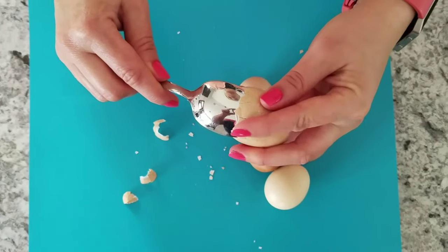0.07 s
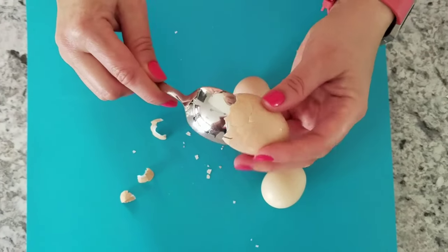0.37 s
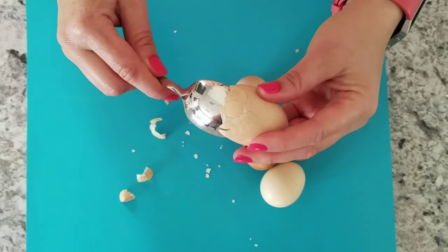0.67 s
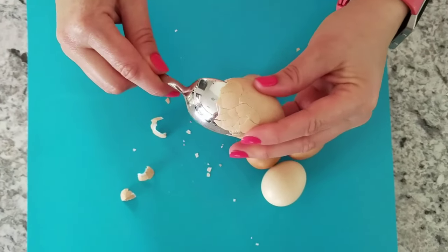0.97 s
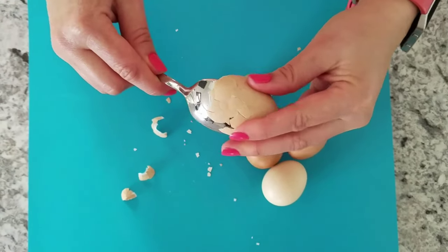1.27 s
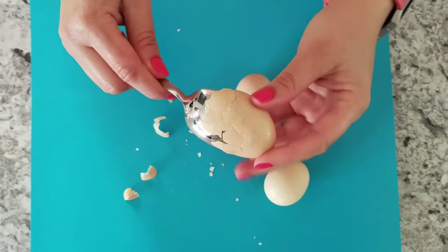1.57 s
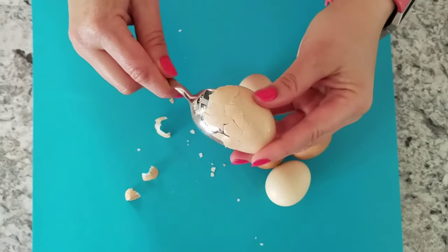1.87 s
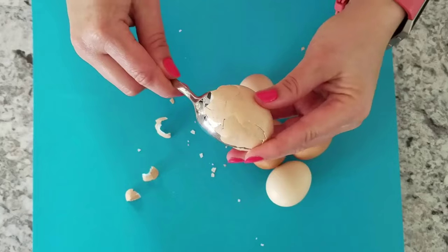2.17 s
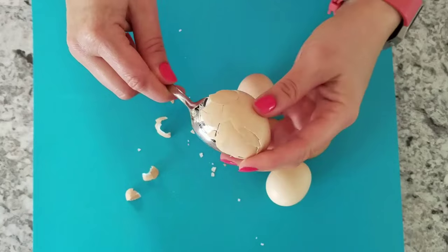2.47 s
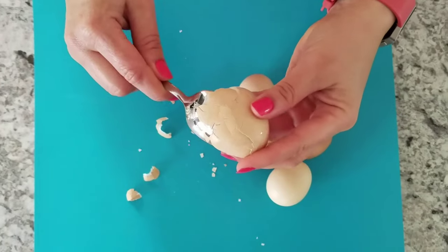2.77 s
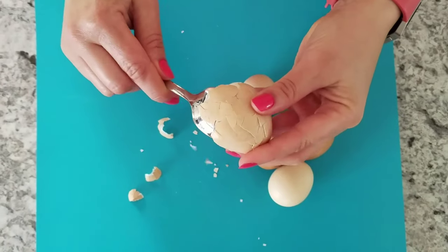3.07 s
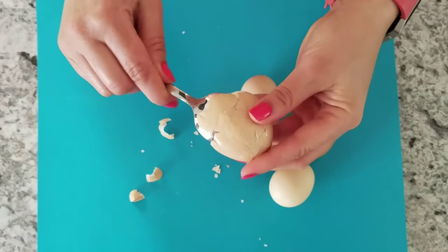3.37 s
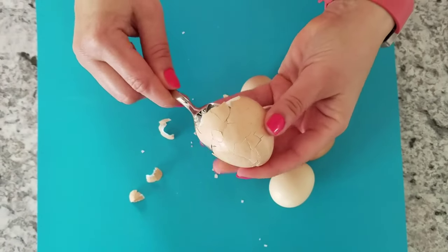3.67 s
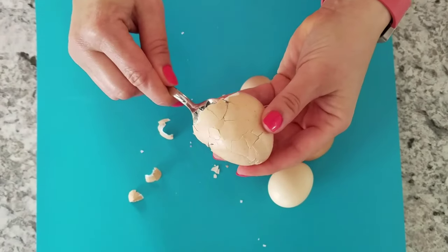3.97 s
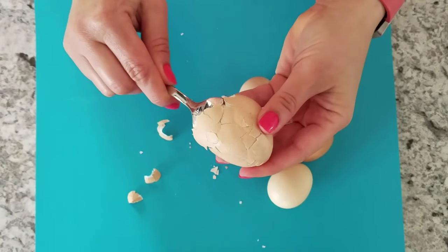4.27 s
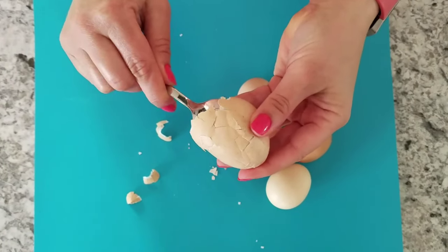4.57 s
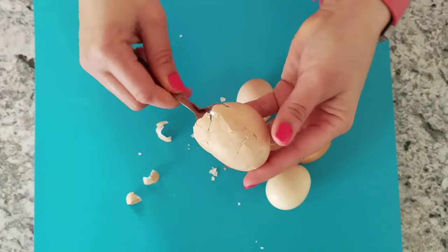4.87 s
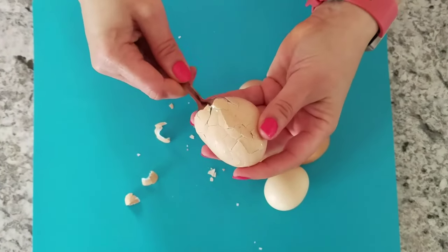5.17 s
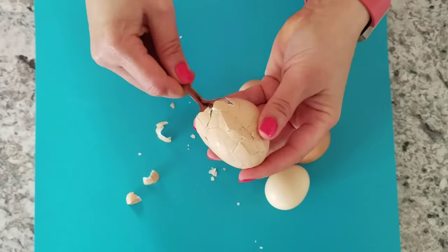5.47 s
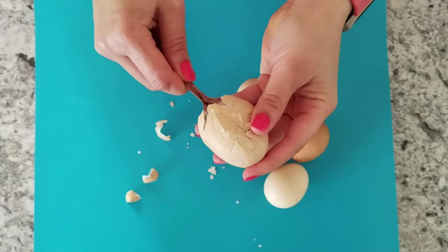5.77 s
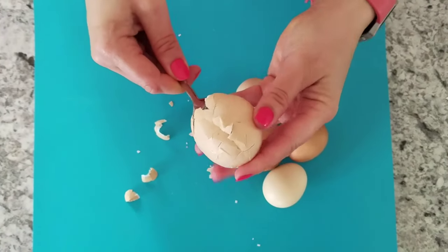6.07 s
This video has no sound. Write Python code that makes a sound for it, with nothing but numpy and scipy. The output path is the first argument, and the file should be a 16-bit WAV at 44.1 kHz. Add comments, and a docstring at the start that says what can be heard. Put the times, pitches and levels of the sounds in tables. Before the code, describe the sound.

A spoon works under the cracked shell of a boiled egg, close to the microphone in a small kitchen. The shell gives way in irregular clusters of dry, crisp snaps, with faint gritty scraping between them. About halfway through come the two loudest cracks, each with a slight thud, and then softer crackling carries on. Hard walls add a short echo, and appliances hum faintly.

```python
"""Spoon peeling a boiled egg

A spoon works under the cracked shell, close to a camera in a small kitchen. The shell gives way
in dry snaps, each ringing the flap it frees and trailing tiny splinters. Between them the spoon
grates on shell and membrane. Hard walls answer; appliances hum."""
import sys
import numpy as np
from scipy import signal
from scipy.fft import rfft, irfft, next_fast_len
from scipy.io import wavfile
from scipy.ndimage import map_coordinates

SR = 44100
rng = np.random.default_rng(int(sys.argv[2]) if len(sys.argv) > 2 else 0)


def put_to_file(sound):
    """Save the sound as 16-bit audio at rate SR, in the file named by the first command-line argument."""
    columns = np.atleast_2d(sound).T  # one column per channel
    safe = np.clip(columns, -1, 1)
    whole_steps = np.round(safe * 32767)
    wavfile.write(sys.argv[1], SR, whole_steps.astype(np.int16))


N = 269892

# Clear breaks. Each row: start in seconds, relative level in dB, flap resonance in Hz, tilt in dB/octave.
SHELL_BREAKS = [(0.0169, -23.5, 2000, 7), (0.0526, -16.5, 1980, 5.5), (.1244, -21.5, 6200, 4),
                (.2745, -34, 8400, 4), (0.4558, -34.5, 8040, 1), (0.6556, -37, 7000, 21),
                (0.8167, -19, 4180, 14), (0.8217, -16.5, 5700, 12), (0.882, -14, 5300, 2),
                (0.9034, -16, 2980, 5.5), (1.0034, -26, 2980, 3.5), (1.0304, -26, 7040, 0),
                (1.2153, -23.5, 4330, -3), (1.2342, -18, 1950, 2.5), (1.2912, -11, 2100, 2.5),
                (1.3075, -19, 6000, 4), (1.3626, -16, 8000, 2), (1.5212, -24, 6600, -2.5),
                (1.9387, -30, 3970, 5.5), (1.9745, -19.5, 8600, -2.5), (2.024, -17.5, 2960, 9),
                (2.1659, -14, 7800, -3), (2.212, -12, 7900, 15), (2.2243, -14.5, 8500, 7),
                (2.2464, -8.5, 4200, 8), (2.2738, -11.5, 4800, 6.5), (2.2984, -9, 5450, 5.5),
                (2.411, -15, 5660, -2.5), (2.611, -27, 6560, 9), (2.833, -29.5, 6850, -2),
                (2.9331, 4, 4470, 8), (2.969, -7, 3800, 6.5), (3.1313, -4, 3840, 1.5),
                (3.1364, -14.5, 3430, 2.5), (3.1712, -18.5, 5000, 4), (3.2616, 1, 8440, 11.5),
                (3.2689, -12.5, 3400, 1), (3.307, -5, 3400, 6.5), (3.3741, -15, 2630, 4),
                (3.4711, -19.5, 5430, 1), (3.5767, -26, 6440, -5.5), (3.7338, -22, 3180, 4),
                (3.8049, -27.5, 3220, -1), (3.8887, -29.5, 3100, 2.5), (3.973, -15.5, 2760, 3),
                (3.9832, -23, 3150, -2.5), (4.0515, -17, 2400, 6.5), (4.0622, -14.5, 2000, 9),
                (4.0773, -15, 2690, 3), (4.0859, -12.5, 3730, 4), (4.306, -27, 6600, -3.5),
                (4.3805, -25, 5740, -5.5), (4.4318, -21.5, 3200, -2), (4.5087, -19, 2690, -4),
                (4.5922, -19.5, 2000, 1.5), (4.6351, -17, 6040, 5), (4.6417, -15.5, 6950, 1),
                (4.679, -17.5, 7100, 10), (4.6936, -20, 7100, 5), (4.7891, -23, 2000, 0.5),
                (4.8228, -11.5, 6000, 2), (4.8542, -14.5, 4870, 0), (5.109, -29, 2820, -5.5),
                (5.2132, -21.5, 6300, -6), (5.367, -25.5, 2000, 4.5), (5.4138, -25.5, 2230, -4.5),
                (5.5493, -18.5, 2000, 14), (5.5856, -18, 2200, 4), (5.6352, -21, 2080, 2.5),
                (5.6752, -13, 2730, 0.5), (5.6906, -15.5, 5000, 2.5), (5.7323, -9.5, 2400, 1.5),
                (5.8604, -21, 2000, 5), (5.8879, -12.5, 2500, 1), (5.9232, -18, 8000, -1.5)]
# Spectrum of breaking shell. Each row: frequency in Hz, gain in dB.
SHELL_DB = [(100, -9), (300, -3), (800, -11.5), (1400, -4), (1750, -4.5), (2100, -1.5), (3000, 0),
            (5200, 2.5), (6800, 0.5), (8200, 4), (9500, -1.5), (11500, 0.5), (13500, 1)]
# Ring of the egg in the spoon's bowl. Each row: frequency in Hz, relative level in dB, T60 in seconds.
BOWL_MODES = [(2100, 3.5, 0.03), (2670, -14, 0.042), (3180, 7, 0.022), (3810, -4.5, 0.048),
              (4800, -1.5, 0.019), (5510, 2, 0.014), (8480, 3, 0.0063)]
# The loose flap grows, so its pitch sinks. Each row: time in seconds, resonance in Hz.
LOOSE_FLAP_HZ = [(0, 5300), (2.95, 4380), (3.2, 3650), (4.5, 2780)]
# Spoon slides. Each row: centre in seconds, half-length in seconds, relative level in dB.
SLIDES = [(0.806, 0.05, -53.5), (1.02, 0.052, -62), (1.244, 0.049, -59.5), (1.892, 0.07, -62.5),
          (2.247, 0.068, -46.5), (2.442, 0.066, -67), (2.63, 0.038, -56.5), (2.819, 0.057, -59.5),
          (2.957, 0.027, -39), (3.205, 0.087, -51.5), (3.313, 0.034, -45.5), (4.079, 0.054, -49.5),
          (4.461, 0.14, -61.5), (4.695, 0.061, -58.5), (5.567, 0.036, -54), (5.774, 0.078, -59),
          (6.001, 0.11, -58.5)]
# Jolts of the whole egg. Each row: start in seconds, relative level in dB.
EGG_JOLTS = [(0.841, -31.5), (2.412, -41), (2.9343, -13.5), (3.2631, -19.5), (5.8888, -37)]
# Spectrum of the egg's thud. Each row: frequency in Hz, gain in dB.
THUD_DB = [(60, -19), (160, -10), (300, -4), (600, -3), (1100, -5.5), (1600, -20.5), (3000, 14),
           (8000, -16)]
# Bias of close sound. Each row: frequency in Hz, right microphone over left in dB.
RIGHT_BIAS_DB = [(1000, 0.5), (1700, -6.5), (2300, -2.5), (3100, -8.5), (4000, 11), (4400, 0.5), (5500, 7),
                 (7000, 4), (8200, 12), (9500, 7), (11000, -2.5), (14000, -3.5)]
# Kitchen decay. Each row: frequency in Hz, T60 in seconds.
ROOM_T60_S = [(500, 0.4), (4000, 0.51), (13000, 0.35)]
# Colour of the reflections. Each row: frequency in Hz, gain in dB.
ROOM_DB = [(300, -17), (1500, -2), (3500, -4), (6000, -7), (8200, -8.5), (13000, -6.5)]
# Air noise. Each row: frequency in Hz, relative density in dB.
AIR_DB = [(25, -16), (45, -4.5), (75, 0), (130, 2), (250, -3), (400, -7.5), (650, -9.5), (1000, -12.5),
          (2000, -15.5), (4000, -25.5), (7000, -30), (13000, -27)]
# Stereo likeness of the air. Each row: frequency in Hz, left-right correlation.
AIR_CORRELATION = [(60, 0.86), (150, 0.86), (380, 0.58), (950, 0.13), (2380, -0.043), (5980, -0.04),
                   (15000, 0.54)]
# Mains hum and motor whine. Each row: frequency in Hz, rms level in dB.
HUM_LINES = [(120, -60), (188.5, -83), (300, -81), (377, -78), (790.5, -74)]
# Low motor drone. Each row: frequency in Hz, level in dB before the envelope.
DRONE_LINES = [(61, -67.5), (123, -73), (155, -67), (185, -66.5), (247.6, -69.5), (278, -74)]
# Drone envelope. Each row: time in seconds, gain in dB.
DRONE_GAIN_DB = [(0, -5.5), (.8, 3.5), (1.25, -3), (1.35, -17), (6.1, -15)]

TOP_HZ = 14550


def snaps(gain_db=-1.5):
    """Clear breaks where the shell gives way to the spoon."""
    sources = [(s, snap(db + gain_db, flap_hz, tilt)) for s, db, flap_hz, tilt in SHELL_BREAKS]
    return radiate(sources, room_db=-5)


def snap(db, flap_hz, tilt_db_oct, flap_db=7.5, middling_db=-15):
    """One break and its splinters, rung through the bowl. Big breaks take longer, so fizz less."""
    fizz_db = -0.24 * (db - middling_db)
    fizz = pulse(lambda hz: np.interp(hz, [8400, 11200], [0, fizz_db]))
    fracture = signal.fftconvolve(crack(flap_hz, flap_db, tilt_db_oct), fizz)
    rung = signal.fftconvolve(fracture, bowl())
    return amp(db) * signal.fftconvolve(rung, splinters())


def crack(flap_hz, flap_db, tilt_db_oct, width_oct=0.31, knee_hz=1400, plateau_hz=9000):
    """One fracture, unit energy in band: shell colour, lifted at the freed flap's resonance."""
    def colour_db(hz):
        flap = flap_db * np.exp(-0.5 * (np.log2((hz + 1) / flap_hz) / width_oct) ** 2)
        tilt = tilt_db_oct * np.log2(np.clip(hz, knee_hz, plateau_hz) / knee_hz)
        return along(SHELL_DB, hz) + flap + tilt

    click = pulse(colour_db)
    in_band = np.fft.rfftfreq(len(click), 1 / SR) < TOP_HZ
    return click / np.sqrt(np.mean(np.abs(rfft(click)) ** 2 * in_band))


def bowl(ring_db=-13, vary_db=3):
    """A break passes straight on and rings the bowl's modes, at new strengths for each spot."""
    t = np.arange(SR // 40) / SR
    ring = sum(amp(db + vary_db * rng.standard_normal() - 60 * t / t60_s) * np.cos(2 * np.pi * hz * t)
               for hz, db, t60_s in BOWL_MODES)
    path = (t == 0) + amp(ring_db) * ring / np.linalg.norm(ring)
    return path / np.linalg.norm(path)


def splinters(count=4, mean_lag_s=0.012, level_db=-20, spread_db=4):
    """Impulse train: the main break, then weak ones as the crack runs on."""
    train = np.zeros(SR // 10)
    train[0] = 1
    lags = rng.exponential(mean_lag_s * SR, count).astype(int) + 1
    gains = amp(level_db + spread_db * rng.standard_normal(count))
    np.add.at(train, np.minimum(lags, len(train) - 1), gains)
    return train


def crumbs(per_slide=3, level_db=-32, spread_db=2, spread_s=0.06, spread_oct=0.53):
    """Small pieces break off at random around each slide."""
    centres_s = np.repeat([s for s, _, _ in SLIDES], per_slide)
    draws = np.clip(rng.standard_normal((len(centres_s), 3)), -2, 2)
    sources = []
    for s, (when, size, pitch) in zip(centres_s, draws):
        flap_hz = loose_flap_hz(s) * 2 ** (spread_oct * pitch)
        crumb = snap(level_db + spread_db * size, flap_hz, tilt_db_oct=3.7)
        sources.append((s + spread_s * when, crumb))
    return radiate(sources, room_db=-9)


def grating():
    """Each slide of the spoon swells and fades, crushing a dense run of tiny fractures."""
    sources = []
    for centre_s, half_s, db in SLIDES:
        pressure = np.hanning(int(2 * half_s * SR))
        grains = amp(db) * pressure * ticks(len(pressure), per_s=650, spread_db=5.5)
        click = crack(loose_flap_hz(centre_s), flap_db=6, tilt_db_oct=1.1)
        sources.append((centre_s - half_s, signal.fftconvolve(grains, click)))
    return radiate(sources, room_db=0)


def loose_flap_hz(s):
    """Resonance of the shell that has come loose by time s."""
    return np.interp(s, *np.transpose(LOOSE_FLAP_HZ))


def handling(early_db=-80, late_db=-69):
    """Cracked shell ticks faintly in the fingers, louder as it loosens."""
    grains = amp(np.linspace(early_db, late_db, N)) * ticks(N, per_s=120, spread_db=2.5)
    click = crack(flap_hz=3400, flap_db=5, tilt_db_oct=1.2)
    return radiate([(0.00089, signal.fftconvolve(grains, click))], room_db=2.5)


def ticks(samples, per_s, spread_db):
    """Tiny fractures of random time and size, rms 1."""
    sizes = amp(spread_db * np.minimum(rng.standard_normal(samples), 2))
    return unit(sizes * (rng.random(samples) < per_s / SR))


def jolts(room_db=-12):
    """Hard breaks jolt the soft egg: short thuds, unscattered by spoon and hands."""
    thud = pulse(lambda hz: along(THUD_DB, hz))
    close, room = np.zeros((2, 2, N))
    for s, db in EGG_JOLTS:
        sound = amp(db) * thud / np.linalg.norm(thud)
        add(close, s, sound)
        add(room, s, kitchen(sound))
    return np.array([close, amp(room_db) * room])


def radiate(sources, room_db, ceiling_s=0.014, ceiling_db=-9):
    """Carry (start in seconds, sound) pairs to a close and a room track, both stereo."""
    close, room = np.zeros((2, 2, N))
    for s, sound in sources:
        add(close, s, signal.fftconvolve(sound[None], scatter(), axes=1))
        add(room, s, kitchen(sound))
        echo = signal.fftconvolve(sound[None], ceiling(), axes=1)
        add(room, s + ceiling_s, amp(ceiling_db) * echo)
    return np.array([close, amp(room_db) * room])


def scatter(tear_s=0.00033, tear_db=2, skew_db=-5, bounce_s=0.0029, bounce_db=-1, dull_hz=11000):
    """Close path: a spike inside a brief tear, then duller bounces off spoon, hands and board."""
    t = np.arange(-SR // 1000, SR // 60) / SR
    # The tear radiates a little differently to each side.
    tear = rng.standard_normal(len(t)) + amp(skew_db) * rng.standard_normal((2, len(t)))
    tear *= np.exp(-np.abs(t) / tear_s)
    bounces = rng.standard_normal((2, len(t))) * np.exp(-np.abs(t) / bounce_s) * (t > 0)
    bounces = signal.lfilter(*signal.butter(1, dull_hz, fs=SR), bounces)
    path = (t == 0) + amp(tear_db) * tear / np.linalg.norm(tear[0])
    path += amp(bounce_db) * bounces / np.linalg.norm(bounces[0])
    return path / np.linalg.norm(path, axis=1, keepdims=True)


def microphones(close, lag_samples=2):
    """Close sound reaches the left port first; the camera body colours each side differently."""
    def shading(side):
        return pulse(lambda hz: -10 * np.log10((1 + amp(side * along(RIGHT_BIAS_DB, hz)) ** 2) / 2))

    left = signal.fftconvolve(close[0], shading(1))
    right = signal.fftconvolve(close[1], shading(-1))
    return np.array([left[:N], np.pad(right, (lag_samples, 0))[:N]])


def ceiling(smear_s=0.0047):
    """One smeared stereo reflection off the ceiling."""
    t = np.arange(SR // 100) / SR
    echo = rng.standard_normal((2, len(t))) * np.exp(-t / smear_s)
    return echo / np.linalg.norm(echo[0])


def kitchen(sound, build_s=0.0013):
    """A fresh diffuse tail: it builds up, then each frequency dies at its own rate."""
    hz, frame_s, spectra = signal.stft(rng.standard_normal((2, SR // 2)), SR, nperseg=256)
    decay = amp(-60 * frame_s / along(ROOM_T60_S, hz)[:, None])
    _, tail = signal.istft(spectra * decay, SR, nperseg=256)
    t = np.arange(tail.shape[1]) / SR
    tail *= 1 - np.exp(-(t / build_s) ** 2)
    return signal.fftconvolve(sound[None], tail / np.linalg.norm(tail[0]), axes=1)


def appliances():
    """Steady mains hum and motor whine; a low drone swells, then drops away near 1.3 s."""
    hum = motor_tones(HUM_LINES, waver_db=1.2, drift_rad=0.14)
    drone = motor_tones(DRONE_LINES, waver_db=3, drift_rad=0.45)
    envelope_db = np.interp(np.arange(N) / SR, *np.transpose(DRONE_GAIN_DB))
    return hum + amp(envelope_db) * drone


def motor_tones(lines, waver_db, drift_rad):
    """Motor lines, each unsteady in level and phase."""
    t = np.arange(N) / SR
    total = np.zeros(N)
    for hz, db in lines:
        peak = np.sqrt(2) * amp(db + waver_db * wobble(5))
        total += peak * np.sin(2 * np.pi * hz * t + drift_rad * wobble(3))
    return total


def air(rms_db=-61):
    """Room noise: nearly mono in the bass, wide above it."""
    def mid_side_gains(hz):
        angle = np.arccos(along(AIR_CORRELATION, hz)) / 2
        return amp(along(AIR_DB, hz)) * [np.cos(angle), np.sin(angle)]

    mid, side = filtered(rng.standard_normal((2, N)), mid_side_gains)
    return amp(rms_db) * unit(np.array([mid + side, mid - side]))


def amp(db):
    """Decibels to gain."""
    return 10 ** (np.asarray(db) / 20)


def unit(x):
    """Scale to rms 1."""
    return x / np.sqrt(np.mean(x ** 2) + 1e-20)


def along(points, hz):
    """Read (Hz, value) rows on a log frequency axis."""
    knots_hz, values = np.transpose(points)
    return np.interp(np.log(hz + 1), np.log(knots_hz + 1), values)


def wobble(knots_per_s):
    """Smooth random curve."""
    knots = rng.standard_normal(int(N * knots_per_s / SR) + 4)
    return map_coordinates(knots, [np.arange(N) * knots_per_s / SR])


def filtered(x, gain):
    """Zero-phase filter with response gain(hz)."""
    size = next_fast_len(N + SR // 2)
    return irfft(rfft(x, size) * gain(np.fft.rfftfreq(size, 1 / SR)), size)[..., :N]


def pulse(colour_db, size=512):
    """Minimum-phase pulse with spectrum colour_db(hz)."""
    hz = np.fft.rfftfreq(size, 1 / SR)
    cepstrum = irfft(np.log(amp(colour_db(hz)) + 1e-6))
    cepstrum[1:size // 2] *= 2
    cepstrum[size // 2 + 1:] = 0
    return irfft(np.exp(rfft(cepstrum)))


def add(track, start_s, sound):
    """Mix a sound into a track."""
    start = max(round(start_s * SR), 0)
    part = track[..., start:start + sound.shape[-1]]
    part += sound[..., :part.shape[-1]]


def scene():
    """Shell sounds, close and reflected, over the kitchen's background."""
    close, room = snaps() + crumbs() + grating() + handling() + jolts()
    lean_right = amp([[-1], [1]])
    walls = filtered(room, lambda hz: amp(along(ROOM_DB, hz))) * lean_right
    return microphones(close) + walls + air() + appliances()


def record(dry):
    """Steep low-pass at the camera's band limit."""
    return filtered(dry, lambda hz: 1 / np.sqrt(1 + (hz / TOP_HZ) ** 160))


dry = scene()
out = record(dry)
put_to_file(out)
```